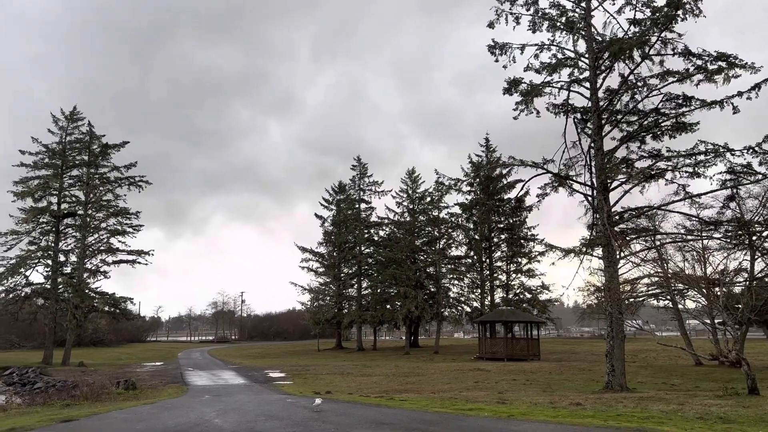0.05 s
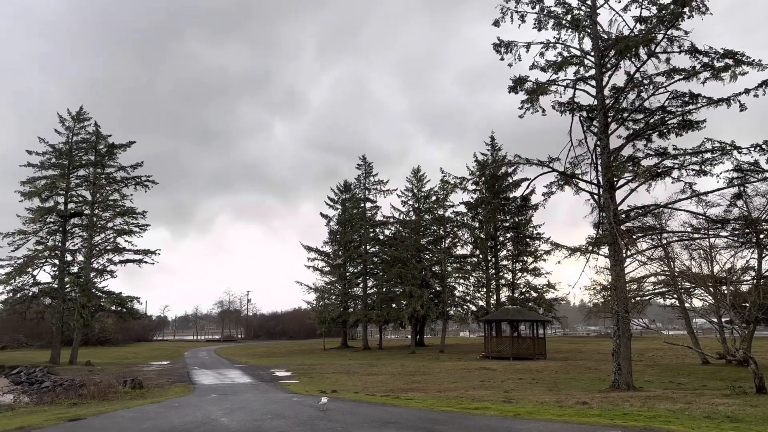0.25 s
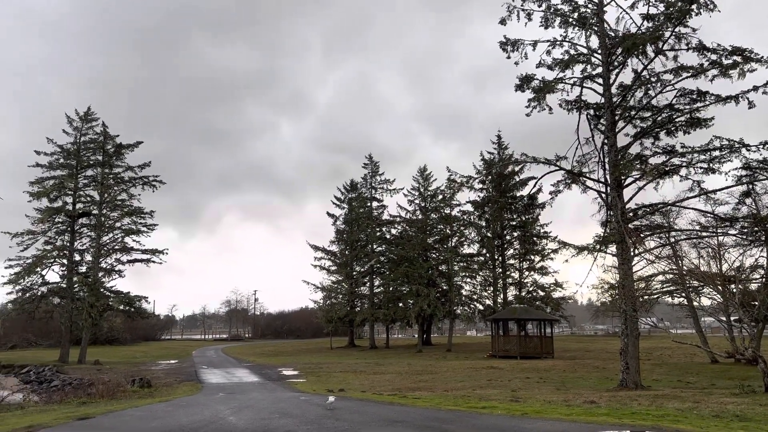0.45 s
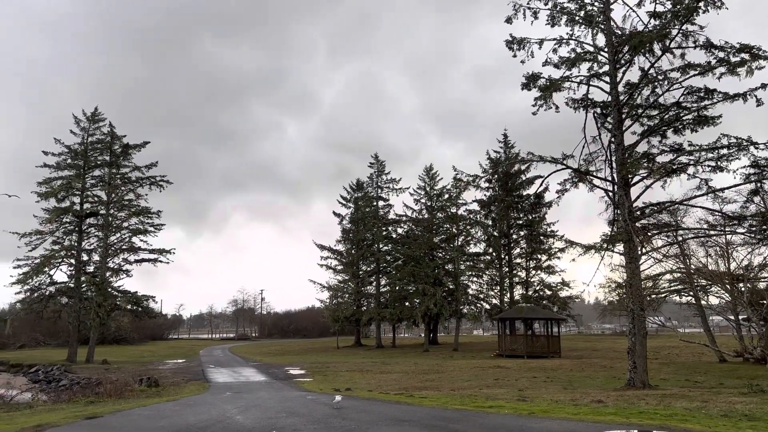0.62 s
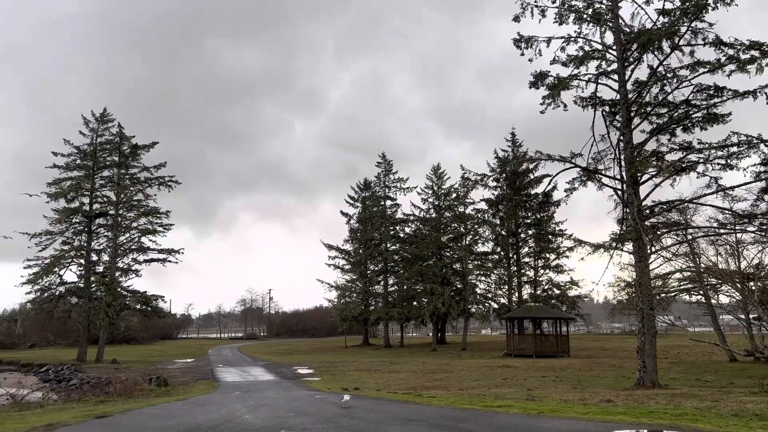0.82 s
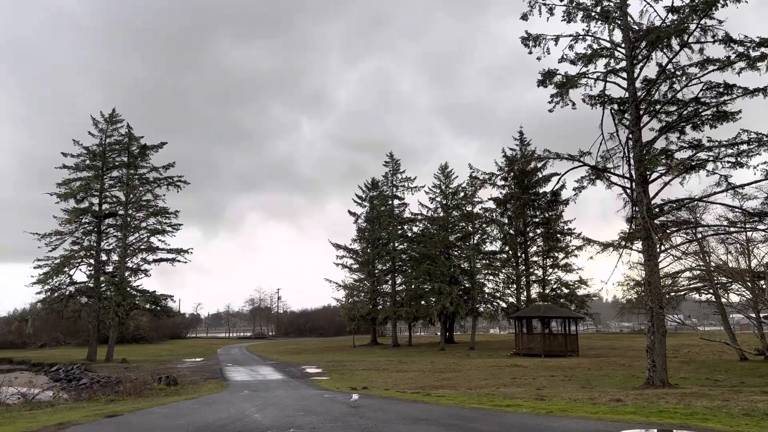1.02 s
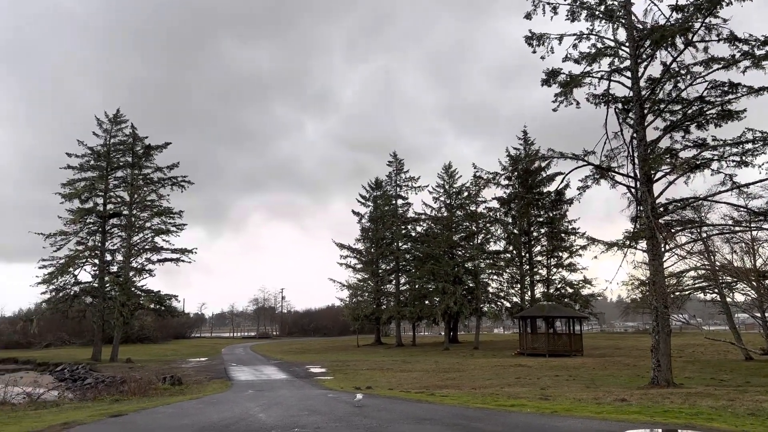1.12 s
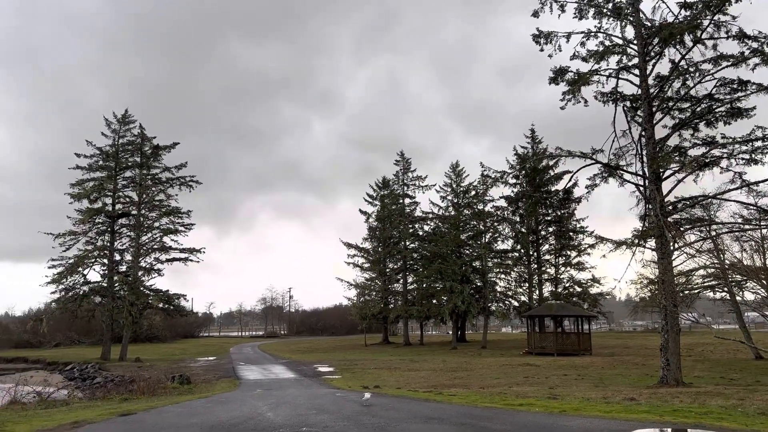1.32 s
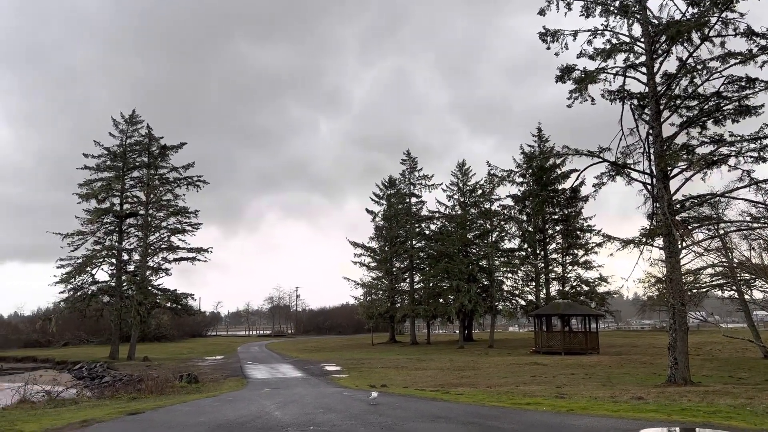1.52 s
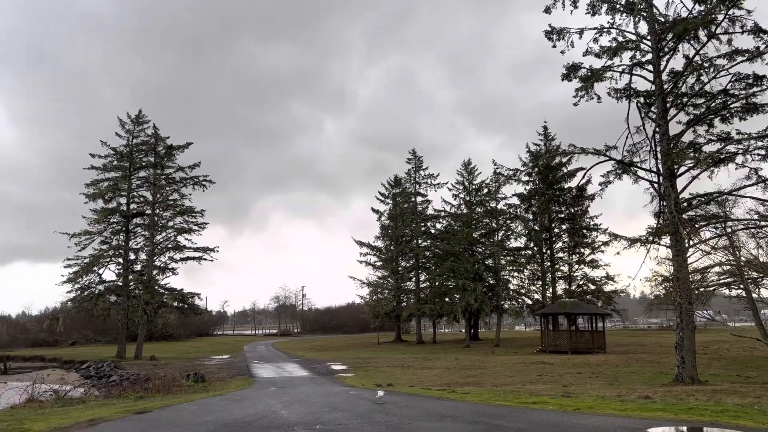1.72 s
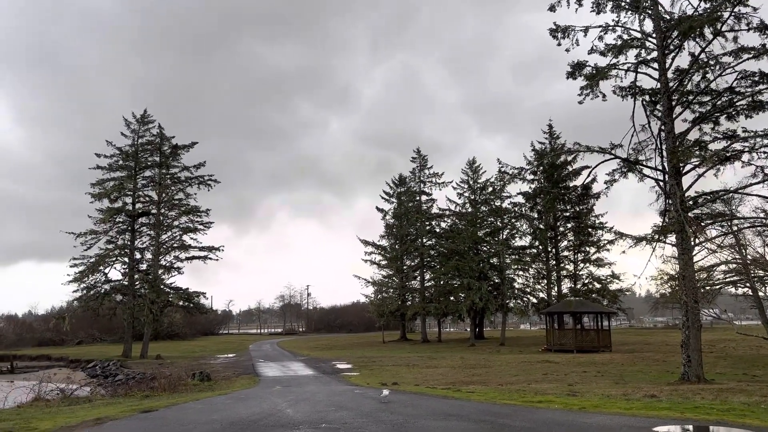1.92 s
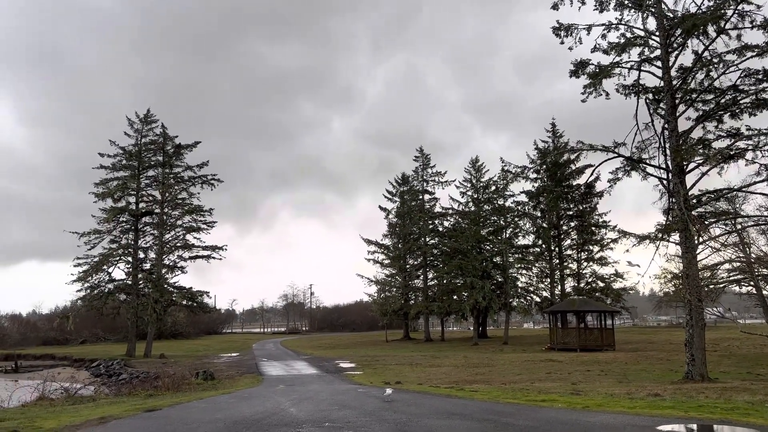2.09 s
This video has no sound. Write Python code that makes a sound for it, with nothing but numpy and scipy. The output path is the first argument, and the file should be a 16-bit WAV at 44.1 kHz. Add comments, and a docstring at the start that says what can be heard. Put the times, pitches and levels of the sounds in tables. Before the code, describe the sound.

A bird gives one thin, falling squeal over wind rumble and distant rushing water.

```python
"""A bird, probably a gull, gives one thin falling squeal in an overcast riverside park. A clear, slightly
raspy note breaks into a two-voiced whine, a low voice modulating a high one, and drops away; a second
call just begins, and the trees return dull echoes. Wind rumbles on the microphone and its eddies thump
it. Water rushes in the distance, an airy hiss follows the breeze, and a few faint ticks sound close by."""
import sys
import numpy as np
from scipy import signal
from scipy.fft import rfft, irfft
from scipy.io import wavfile
from scipy.ndimage import uniform_filter1d

SR = 44100
rng = np.random.default_rng(int(sys.argv[2]) if len(sys.argv) > 2 else 0)


def persist_wave(psi):
    """Save psi, clipped to +-1, as 16-bit WAV."""
    counts = np.round(np.clip(psi, -1, 1) * 32767).astype(np.int16)
    wavfile.write(sys.argv[1], SR, np.atleast_2d(counts).T)


N = 94815
T = np.arange(N) / SR
HZ = np.maximum(np.fft.rfftfreq(N, 1 / SR), 1)
SIDES = np.array([[.5], [-.5]])  # splits a pan (left minus right) between the channels
PITCH_JITTER, RASP_DEPTH = 0.0024, 0.56  # the bird's unsteadiness, as shares of pitch and of amplitude


def from_db(db):
    """Decibels to gain."""
    return 10 ** (np.asarray(db) / 20)


def rms_one(x):
    """Scale to rms 1."""
    return x / np.sqrt(np.mean(x ** 2) + 1e-20)


def in_time(rows):
    """One automation curve for each column after the time."""
    times, *columns = np.transpose(rows)
    return [np.interp(T, times, column) for column in columns]


def at_hz(points, hz):
    """Read a table on a log-frequency axis."""
    f, value = np.transpose(points)
    return np.interp(np.log(hz), np.log(f), value)


def drift(rate_hz):
    """Random modulation of rms 1, mostly slower than rate_hz."""
    return rms_one(irfft(rfft(rng.standard_normal(N)) / (1 + (HZ / rate_hz) ** 2), N))


def noise(eq):
    """Noise of rms 1, coloured by an EQ table."""
    return rms_one(irfft(rfft(rng.standard_normal(N)) * from_db(at_hz(eq, HZ)), N))


def two_ports(x, lead_rad, pan_db=0):
    """The microphone pair: the right side lags the left in phase, and the levels may be panned."""
    turn = np.exp(-1j * lead_rad * np.array([[0], [1]]))
    return irfft(rfft(x) * turn * from_db(pan_db * SIDES), N)


def add(out, start_s, x):
    """Mix x in from start_s on."""
    i = int(start_s * SR)
    out[..., i:i + x.shape[-1]] += x[..., :N - i]


def water(level_db=-56, flicker_db=1.76):
    """Distant water: a wide, steady rush that wavers a little."""
    # colour of the rush: f/Hz, relative level/dB
    eq = [(25, -14), (60, -5), (130, -11), (220, -14), (400, -12), (550, -9.5), (850, -9.5), (1100, -11),
          (1500, -8), (1850, -16), (2200, -14.5), (3000, -22), (5000, -29), (7000, -38), (8200, -36),
          (9200, -43), (10500, -56), (15000, -56)]
    # how alike the two sides are: f/Hz, shared power/0-1
    likeness = [(60, 0.59), (250, 0.93), (480, 0.11), (800, 0.55), (1300, 0.49), (1650, 0.16), (2100, 0.19),
                (3300, 0.26), (9000, 0.28)]
    # stereo phase: f/Hz, left lead/rad
    lead = [(60, -1), (330, -0.17), (620, -3.5), (1500, -3), (1900, -6.5), (2900, -4.5), (4200, -12),
            (15000, -11)]
    # stereo balance: f/Hz, pan/dB
    pan = [(300, 2), (700, 2), (1300, -3), (2400, -1), (4400, 1), (8000, 5.5), (12000, 0)]
    alike = at_hz(likeness, HZ)
    shared, left, right = (rfft(noise(eq) * from_db(flicker_db * drift(42))) for _ in range(3))
    pair = irfft(np.sqrt(alike) * shared + np.sqrt(1 - alike) * np.array([left, right]), N)
    return from_db(level_db) * two_ports(pair, at_hz(lead, HZ), at_hz(pan, HZ))


def hiss(grain_db=3, pan_db=1.5):
    """A faint, grainy hiss that comes and goes with the breeze."""
    # swells of the breeze: t/s, level/dB
    swells = [(0, -99), (.17, -72.5), (.3, -69), (.47, -65), (.56, -67.5), (.68, -73.5), (.87, -73.5),
              (.98, -64), (1.08, -75.5), (1.27, -73.5), (1.42, -66.5), (1.56, -72.5), (1.8, -76),
              (2.15, -92)]
    # airy colour: f/Hz, relative level/dB
    eq = [(800, -15), (1600, 9), (3000, 12), (5000, 8.5), (7000, 4), (8700, 4.5), (10500, -46),
          (15000, -14)]
    db, = in_time(swells)
    pair = np.array([noise(eq) for _ in range(2)]) * from_db(grain_db * drift(170))
    return from_db(db + pan_db * SIDES) * rms_one(pair)


def ticks(decay_s=0.0014, top_hz=8650):
    """Tiny damped taps close by, each with its own colour."""
    # taps: t/s, peak before the high cut/dB, f/Hz, reach above f/octaves (half that below), pan/dB
    taps = [(0.555, -40.5, 1350, 0.51, 3.5), (0.757, -42.5, 1810, 0.32, -4), (.758, -39.5, 7140, 0.88, 7.5),
            (1.341, -49, 2200, 0.34, 1), (1.348, -45, 1480, 0.58, -6), (1.412, -46, 1840, 0.66, -6),
            (1.828, -53, 3830, 0.058, 0), (1.829, -49, 5830, 0.076, 2), (1.83, -51, 7500, 0.7, 6)]
    # stereo phase: f/Hz, left lead/rad
    lead = [(400, 0), (800, -8), (1400, -2), (2200, -1.5), (8000, -1.5)]
    out, t = np.zeros((2, N)), T[:SR // 30]
    for start_s, db, hz, octaves, pan_db in taps:
        tap = signal.unit_impulse(len(t)) + 0.14 * rng.standard_normal(len(t)) * np.exp(-t / decay_s)
        band_hz = [hz / 2 ** (octaves / 2), hz * 2 ** octaves]
        tap = signal.sosfilt(signal.butter(2, band_hz, "band", fs=SR, output="sos"), tap)
        add(out, start_s, from_db(db + pan_db * SIDES) * tap / np.abs(tap).max())
    out = signal.sosfilt(signal.butter(12, top_hz, fs=SR, output="sos"), out)
    return two_ports(out, at_hz(lead, HZ))


def buffets(wake_gain=0.028, wake_decay_s=0.0077, low_cut_hz=49):
    """Each eddy is a pressure kick with a ragged wake, smeared so its lows arrive last and ring on."""
    # eddies that thump the microphone: t/s, peak level/dB, high cut/Hz
    eddies = [(.152, -49, 240), (0.224, -46, 190), (.352, -41.5, 265), (0.397, -38.5, 388),
              (0.441, -39.5, 470), (0.474, -34, 616), (0.504, -30.5, 241), (.512, -40, 332),
              (.533, -39.5, 521), (.543, -35.5, 385), (0.547, -33, 127), (.565, -37.5, 200),
              (0.6, -31, 330), (0.613, -30, 200), (.632, -40, 293), (0.704, -43, 560), (.763, -36.5, 170),
              (0.809, -34, 480), (0.819, -32.5, 320), (0.825, -40, 100), (0.895, -40, 460),
              (.917, -42.5, 262), (1.012, -35.5, 129), (1.059, -43.5, 486), (1.105, -57, 360),
              (1.208, -48.5, 335), (1.326, -39, 466), (1.35, -39, 390), (1.4, -37.5, 550),
              (1.41, -40, 1020), (1.436, -34.5, 460), (1.522, -50, 452), (1.581, -41.5, 192),
              (1.71, -41.5, 524), (1.764, -44.5, 330), (1.838, -44.5, 102), (1.84, -40.5, 580)]
    out, t = np.zeros(N), T[:SR // 5]
    for start_s, db, top_hz in eddies:
        wake = wake_gain * rng.standard_normal(len(t)) * np.exp(-t / wake_decay_s)
        kick = signal.unit_impulse(len(t)) + wake
        for hz in np.geomspace(42.6, 2425, 11):  # an all-pass chain delays the lows
            pole = np.exp(-2 * np.pi * hz / SR)
            kick = signal.lfilter([-pole, 1], [1, -pole], kick)
        thump = signal.sosfilt(signal.butter(2, [low_cut_hz, top_hz], "band", fs=SR, output="sos"), kick)
        thump = signal.sosfilt(signal.butter(2, top_hz, fs=SR, output="sos"), thump)
        add(out, start_s, from_db(db) * thump / np.abs(thump).max())
    return out


def wind(rumble_trim_db=-1, flutter_trim_db=-3.5, apart_trim_db=-10.5, rough_db=0.5):
    """Wind on the microphone ports: rumble, flutter and thumps in both, plus a rumble each gets alone."""
    # gusts, ahead of the trims: t/s, rumble level/dB, flutter level/dB
    gusts = [(0.0, -66, -56.5), (0.26, -54.5, -57.5), (0.32, -56, -60.5), (0.38, -52.5, -49.5),
             (0.49, -44, -48.5), (0.55, -40.5, -49), (0.62, -43, -48.5), (0.69, -48.5, -56),
             (0.83, -45, -46.5), (0.85, -42, -61), (0.89, -45, -48.5), (1.26, -50.5, -55.5),
             (1.35, -45, -49.5), (1.46, -57, -48), (1.48, -54.5, -58.5), (1.6, -49, -50.5),
             (1.63, -54, -53.5), (1.86, -56, -54), (1.89, -56, -63), (2.15, -66, -67.5)]
    # deep colour of the rumble: f/Hz, relative level/dB
    rumble_eq = [(20, -20), (32, -32.5), (45, 0), (58, 4.5), (85, 2), (120, -7), (180, -15.5), (300, -54.5),
                 (600, -101.5)]
    # low-mid colour of the flutter: f/Hz, relative level/dB
    flutter_eq = [(60, -21.5), (120, -6.5), (180, -2), (300, -7.5), (450, -10), (700, -16.5), (1200, -24.5),
                  (3000, -96)]
    rumble_db, flutter_db = in_time(gusts)
    rumble = noise(rumble_eq)
    rumble /= np.sqrt(uniform_filter1d(rumble ** 2, size=3000))  # levelled, so the gusts shape it
    rumble *= from_db(rumble_db + rumble_trim_db)
    flutter = rms_one(noise(flutter_eq) * from_db(rough_db * drift(42)))
    flutter *= from_db(flutter_db + flutter_trim_db)
    apart = from_db(rumble_db + apart_trim_db) * np.array([noise(rumble_eq) for _ in range(2)])
    return apart + two_ports(rumble + flutter + buffets(), lead_rad=-0.99)


def partial(hz, db):
    """One sine of the bird's voice, coloured and placed in stereo by its frequency."""
    # stereo balance: f/Hz, pan/dB
    pan = [(2600, -4), (2850, -5), (3200, -8.5), (3800, -8.5), (4300, 1), (5500, 2), (5850, 11),
           (6300, 9.5), (7000, 2), (9000, 0)]
    # stereo phase: f/Hz, left lead/rad
    lead = [(2700, 1.5), (3200, 1), (4200, 0), (5600, -2), (5850, -2.5), (6300, -7.5), (7000, -5),
            (8500, -6), (11000, -11), (12400, -8.5), (15500, -12.5)]
    # softened top end: f/Hz, gain/dB
    eq = [(9100, 1), (9900, -10), (11200, -7), (12600, -4.5), (15300, -4.5)]
    phase = 2 * np.pi * np.cumsum(hz) / SR + at_hz(lead, hz) * SIDES
    return np.sqrt(2) * from_db(db + at_hz(eq, hz) + at_hz(pan, hz) * SIDES) * np.sin(phase)


def flicker(depth_db=2):
    """Unsteady level of a weak partial, in dB."""
    return depth_db * drift(17)


def rough(depth):
    """Fast, uneven flutter of the voice, as a gain of rms 1."""
    return rms_one(1 + depth * drift(88))


def gate(rows):
    """Open from a note's first row to its last, with 2 ms fades."""
    return uniform_filter1d(1. * (T > rows[0][0]) * (T < rows[-1][0]), size=90)


def clear_note(rows, rasp_jitter=0.0092):
    """A whistle with harmonics; when pushed, alternate cycles differ and a rasp appears between them."""
    # upper harmonics: multiple of the pitch, level against the fundamental/dB
    overtones = [(4, -39), (5, -31.5)]
    # rasp partials: multiple of half the pitch, level against the rasp curve/dB
    rasp_lines = [(3, -2), (5, 2), (7, 2), (9, -5), (11, -9)]
    hz, db, octave_db, third_db, rasp_db = in_time(rows)
    hz *= 1 + PITCH_JITTER * drift(140)
    out = partial(hz, db) + partial(2 * hz, octave_db) + partial(3 * hz, third_db)
    out += sum(partial(k * hz, db + rel_db + flicker()) for k, rel_db in overtones)
    half_hz = hz / 2 * (1 + rasp_jitter * drift(100))
    out += sum(partial(k * half_hz, rasp_db + rel_db) * rough(RASP_DEPTH) for k, rel_db in rasp_lines)
    return out * gate(rows)


def voice_break(octave_rel_db=-19):
    """The voice flips up for an instant between its two registers."""
    # the squeak: t/s, f/Hz, relative level/dB
    squeak = [(.359, 4590, -81), (.365, 4720, -60), (.37, 4660, -65.5), (.376, 4690, -82)]
    hz, db = in_time(squeak)
    return (partial(hz, db) + partial(2 * hz, db + octave_rel_db)) * rough(RASP_DEPTH) * gate(squeak)


def whine(low_jitter=0.015, third_rel_db=-19.5, waver_db=1.5, sideband_waver_db=2.2):
    """A low voice modulates the high one and sets sidebands around its harmonics; the note wavers."""
    # the two voices: t/s, high f/Hz, low f/Hz,
    # then relative level/dB of the fundamental, octave, lower sideband and upper sideband
    voices = [(.359, 3365, 510, -74, -97, -79, -81), (.368, 3340, 489, -64, -58.5, -68, -61.5),
              (.385, 3293, 495, -57, -72, -70, -63), (.41, 3230, 465, -54, -57.5, -73, -72),
              (.44, 3195, 438.4, -54.5, -61.5, -62.5, -77), (.47, 3122, 395.3, -57.5, -66.5, -58.5, -72),
              (.51, 3093, 382, -62.5, -61, -59, -70), (.55, 3076, 372, -65.5, -60.5, -60, -71.5),
              (.59, 3061, 377, -56, -68.5, -60.5, -77), (.63, 3008, 356, -52.5, -62.5, -68, -78),
              (.645, 2995, 346, -57, -64.5, -58.5, -75), (.656, 2960, 340, -67, -91, -75, -83)]
    # combination tones: multiple of the high voice, of the low voice, level against the octave/dB
    combinations = [(2, -2, -23), (2, 1, -12), (3, -2, -22)]
    # second upper sideband: t/s, relative level/dB
    second_sideband = [(.395, -75), (.41, -65), (.437, -71), (.475, -82), (.65, -84)]
    # sideband below the octave: t/s, relative level/dB
    below_octave = [(.36, -85), (.372, -62.5), (.398, -65), (.412, -79), (.43, -61), (.49, -64.5),
                    (.54, -66.5), (.63, -66), (.656, -79)]
    high, low, db, octave_db, lower_db, upper_db = in_time(voices)
    high *= 1 + PITCH_JITTER * drift(110)
    low *= 1 + low_jitter * drift(150)
    out = partial(high, db) + partial(2 * high, octave_db)
    out += partial(high - low, lower_db + sideband_waver_db * drift(25))
    out += partial(high + low, upper_db + flicker())
    out += sum(partial(k * high + m * low, octave_db + rel_db + flicker()) for k, m, rel_db in combinations)
    out += partial(high + 2 * low, in_time(second_sideband)[0]) * rough(RASP_DEPTH)
    out += partial(2 * high - low, in_time(below_octave)[0] + sideband_waver_db * drift(25))
    out += sum(partial(hz, octave_db + third_rel_db + flicker()) for hz in (3 * high, 3 * high - low))
    return out * gate(voices) * rough(depth=0.11) * from_db(waver_db * drift(41))


def bird(echo_top_hz=4500):
    """The squeal, the start of the next, and their dull echoes from the trees."""
    # three clear notes: t/s, f/Hz, then relative level/dB of fundamental, octave, third harmonic, rasp
    opening = [(.207, 2930, -88, -89, -100, -100), (.22, 2960, -55, -77, -99.5, -104),
               (.243, 2910, -52.5, -53.5, -63.5, -91), (.266, 2842, -49, -48.5, -62, -64.5),
               (.285, 2800, -49, -50, -80, -64.5), (.297, 2780, -46.5, -56, -78, -68),
               (.33, 2800, -47.5, -61, -63, -65), (.357, 2777, -48, -57, -61.5, -73),
               (.368, 2920, -82, -82, -90, -91)]
    ending = [(.644, 2674, -72, -80, -88, -95), (.652, 2590, -56, -76, -85, -92),
              (.664, 2530, -60.5, -65, -74, -101), (.674, 2484, -83, -82, -92, -100)]
    next_call = [(2.1, 3350, -86, -95, -92, -98), (2.111, 3255, -61.5, -75, -77, -97),
                 (2.119, 3140, -95, -86, -102, -100), (2.129, 3200, -66, -68.5, -66, -100),
                 (2.15, 3104, -64, -72, -70, -98)]
    # reflections off the trees: delay/s, level/dB
    echoes = [(.023, -27), (.051, -23), (.094, -21)]
    out = clear_note(opening) + voice_break() + whine() + clear_note(ending) + clear_note(next_call)
    dull = signal.sosfilt(signal.butter(2, echo_top_hz, fs=SR, output="sos"), out)
    for delay_s, db in echoes:
        add(out, delay_s, from_db(db) * dull[::-1])  # left and right swapped
    return out


def scene():
    """The bird over wind, water, hiss and ticks, in stereo."""
    return bird() + wind() + water() + hiss() + ticks()


def record(dry):
    """A steep high cut takes off the very top."""
    stop_db, stop_hz = 60, 16485
    return signal.sosfilt(signal.cheby2(14, stop_db, stop_hz, fs=SR, output="sos"), dry)


dry = scene()
out = record(dry)
persist_wave(out)
```